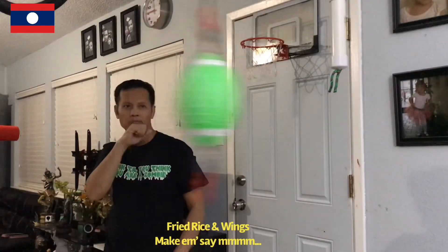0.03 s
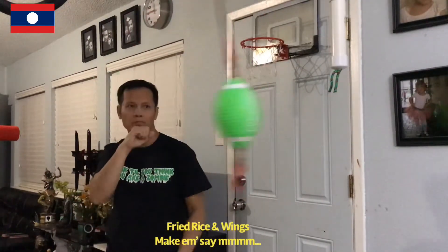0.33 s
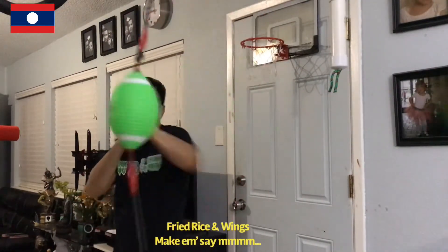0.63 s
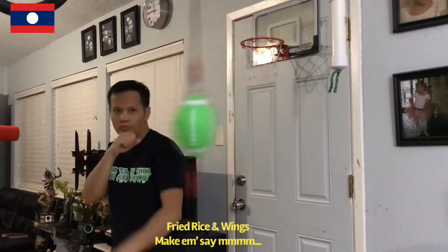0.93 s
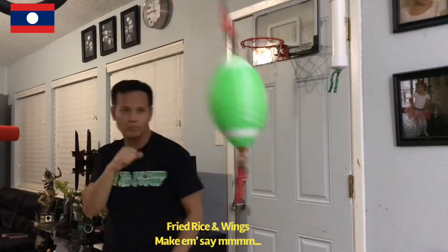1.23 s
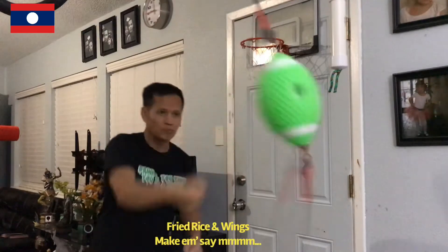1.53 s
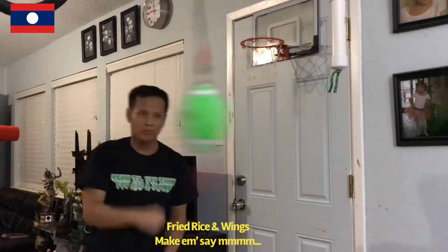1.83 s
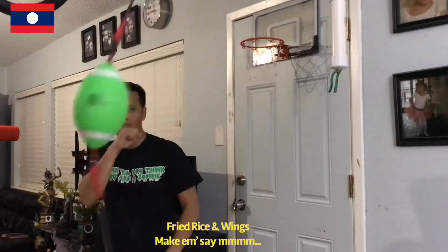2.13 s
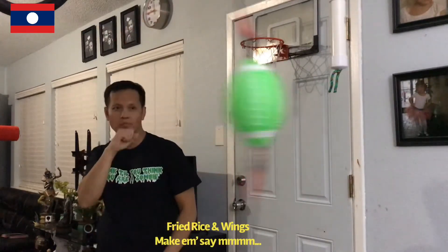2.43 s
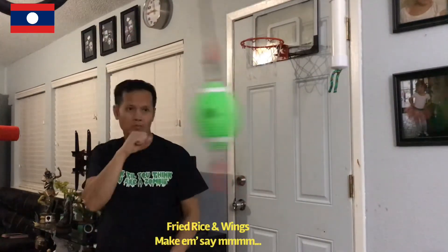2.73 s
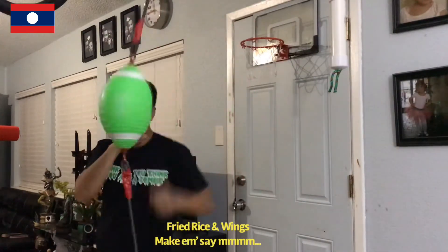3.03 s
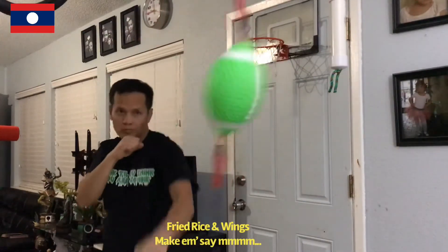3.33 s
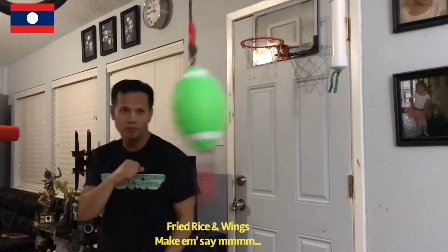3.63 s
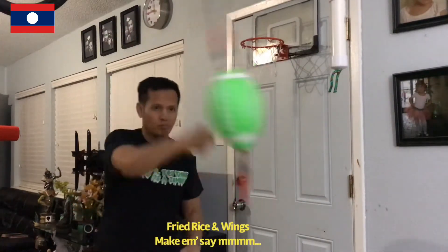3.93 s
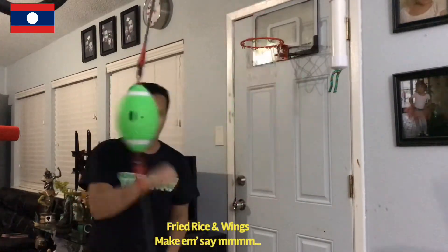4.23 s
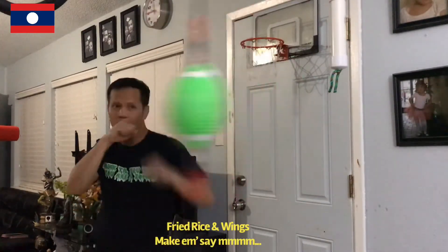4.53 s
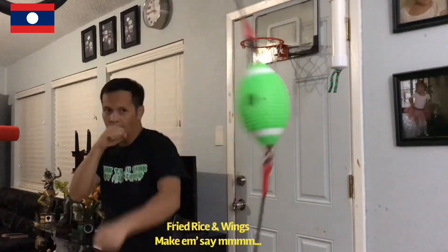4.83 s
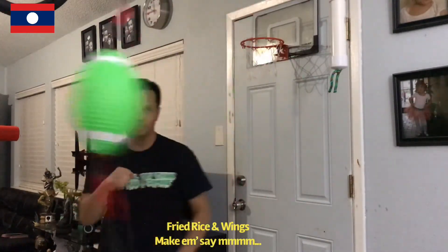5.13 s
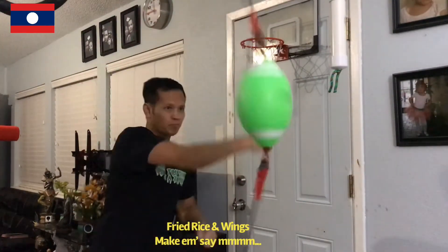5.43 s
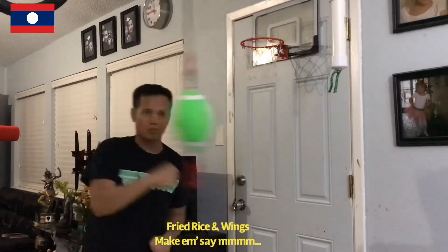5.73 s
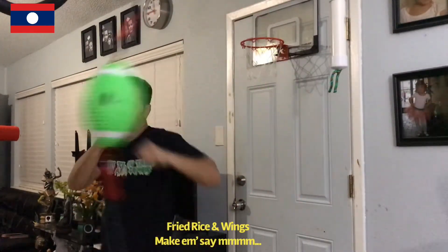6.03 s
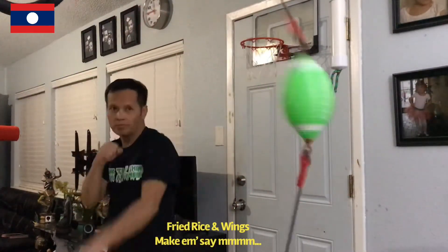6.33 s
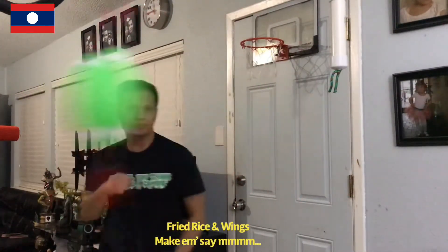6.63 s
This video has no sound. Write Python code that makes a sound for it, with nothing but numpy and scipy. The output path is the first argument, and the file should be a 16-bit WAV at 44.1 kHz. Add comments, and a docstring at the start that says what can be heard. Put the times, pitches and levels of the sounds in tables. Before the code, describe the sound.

Seven steady punches land on a tethered rubber ball, each a hollow thud with a slap on top, the first and fourth the sharpest. Thin, bright rattles from the metal clips follow every blow, and scattered clinks, soft cord rustling and dull little tugs fill the gaps as the ball swings. The sound comes from a single microphone in a slightly boomy living room with a quiet background hiss.

```python
"""Punching a tethered ball

A rubber ball strung between floor and ceiling on a loose cord is punched seven times in a living room.
Each impact gives a slap of knuckles and a hollow thud from the ball's damped modes; the room booms and
reverberates. As the ball swings, the cord rustles and pulls taut, and its metal clips clink and rattle."""
import sys
import numpy as np
from scipy import signal
from scipy.fft import rfft, irfft
from scipy.io import wavfile
from scipy.ndimage import uniform_filter1d

SR = 44100
rng = np.random.default_rng(int(sys.argv[2]) if len(sys.argv) > 2 else 0)


def pcm_store(signal):
    """Save signal as 16-bit PCM."""
    levels = np.round(np.clip(np.atleast_2d(signal), -1, 1) * 32767)
    wavfile.write(sys.argv[1], SR, levels.astype(np.int16).T)


N = 294588

# Levels in all tables are relative; T60 is the time a vibration takes to fall by 60 dB.
# punches: t/s, thud level/dB, boom level/dB, slap level/dB in four bands, factor on the ball's pitch
PUNCHES = [(0.6202, -31.5, -42.5, -32.5, -38, -22.5, -22.5, 1.03),
           (1.3744, -36, -46, -45.5, -50, -60.5, -60, .97),
           (3.1030, -34, -36.5, -44, -48, -55, -50.5, 1.02),
           (3.8653, -29, -40, -36.5, -37.5, -33.5, -31, 1.027),
           (4.6037, -32.5, -42.5, -32.5, -44, -34, -37, .99),
           (5.3393, -32.5, -35.5, -36.5, -47, -44.5, -37.5, 0.89),
           (6.0836, -38.5, -41.5, -40.5, -45, -53.5, -62, 0.84)]
# the swinging ball pulls the cord taut: t/s, level/dB
REBOUNDS = [(1.693, -54.5), (2.152, -53.5), (2.582, -66), (3.384, -58), (4.25, -90), (5.747, -55),
            (6.421, -63)]
# friction of the cord, dying away at the end of a swing: t/s, level/dB
RUBBING = [(0.03, -68), (.2, -70), (.37, -88), (.47, -67.5), (1.0, -63), (1.12, -75), (1.93, -69),
           (2.2, -72.5), (2.34, -89), (2.42, -63), (2.6, -75.5), (2.82, -86), (2.94, -67.5), (3.7, -67.5),
           (4.5, -70), (5.0, -78), (5.19, -65), (6.68, -71)]


def gain_of(db):
    """Amplitude ratio of a level in decibels."""
    return 10 ** (np.asarray(db) / 20)


def unit_rms(x):
    """Normalisation to a mean square of 1."""
    return x / np.sqrt(np.mean(x ** 2) + 1e-20)


def curve_at(points, hz):
    """Interpolation of (f/Hz, value) points on a logarithmic frequency axis."""
    f, value = np.transpose(points)
    return np.interp(np.log(hz + 1), np.log(f + 1), value)


def add(mix, s, sound):
    """Superposition: a sound joins the mix at s seconds."""
    part = mix[max(round(s * SR), 0):][:len(sound)]
    part += sound[:len(part)]


def pulse(*spectra, size=4096):
    """Minimum phase: the sharpest causal pulse with the product of the given spectra."""
    hz = abs(np.fft.fftfreq(size, 1 / SR))
    log_gain = np.log(gain_of(sum(curve_at(points, hz) for points in spectra)))
    log_spectrum = np.conj(signal.hilbert(log_gain))
    return np.fft.ifft(np.exp(log_spectrum)).real[:size // 2]


def noise(spectrum):
    """Spectral shaping of white noise, at rms 1."""
    gain = gain_of(curve_at(spectrum, np.fft.rfftfreq(N, 1 / SR)))
    return unit_rms(irfft(rfft(rng.standard_normal(N)) * gain, N))


def ring(modes, pitch=1, size=SR):
    """Free vibration: one exponentially damped sinusoid for each mode, a row each."""
    t = np.arange(size) / SR
    hz, db, t60 = np.transpose(modes)[:, :, None]
    return gain_of(db) * np.exp(-np.log(1000) * t / t60) * np.sin(2 * np.pi * hz * pitch * t)


def detuned_ring(modes, detune, size=SR):
    """Free vibration with each natural frequency shifted at random by a fraction of about detune."""
    return ring(modes, 1 + detune * rng.standard_normal((len(modes), 1)), size)


def background(level_db=-68.5, waver_db=.6):
    """Broadband rumble and hiss of the house, under slight amplitude modulation."""
    spectrum = [(12, -39), (20, -15.5), (53, 3), (74, -7), (113, -7.5), (198, -15), (310, -14),
                (434, -21.5), (642, -18.5), (825, -30.5), (923, -22), (1910, -28), (7000, -33.5),
                (16000, -42)]  # ambient noise: f/Hz, spectral level/dB
    t = np.arange(N) / SR
    waver = sum(np.sin(2 * np.pi * (hz * t + rng.random())) for hz in np.geomspace(1, 12, num=12))
    return gain_of(level_db + waver_db * unit_rms(waver)) * noise(spectrum)


def reverberation(t60_scale, rise_s):
    """Diffuse field: dense random echoes build up, and each band decays at its own rate."""
    decay_times = [(60, 0.99), (200, 0.5), (400, 0.59), (1000, 0.62), (2000, 0.69), (4000, 0.77),
                   (8000, 0.58), (15000, 0.36)]  # reverberation time before scaling: f/Hz, T60/s
    spectrum = [(60, -5.5), (200, -1.5), (450, -8.5), (1000, -1), (4000, -1.5), (9000, -3.5), (15000, -6)]  # strength of the reverberation: f/Hz, level/dB
    hz, t, bands = signal.stft(rng.choice([-1., 1.], SR), SR, nperseg=512)
    decay = np.exp(-np.log(1000) * t / (t60_scale * curve_at(decay_times, hz)[:, None]))
    rise = 1 - np.exp(-(np.arange(SR) / SR / rise_s) ** 2)
    tail = signal.istft(bands * decay, SR, nperseg=512)[1][:SR] * rise
    return signal.fftconvolve(tail / np.linalg.norm(tail), pulse(spectrum))[:SR]


def room(x, direct_db, echo_db, scatter_db, tail_db):
    """Convolution with the room: direct sound, first reflections, scatter from furniture, long tail."""
    reflections = [(.0007, 0.35), (.0041, 0.28), (.0047, 0.49), (.0066, -0.028), (.0079, -0.09),
                   (0.0098, .45), (0.0091, -0.35), (.0184, 0.61)]  # from floor, ceiling, door and walls: delay/s, relative amplitude
    early = np.zeros(SR // 20)
    for delay, gain in reflections:
        add(early, delay, gain_of(echo_db) * np.array([gain]))
    out = gain_of(direct_db) * x + signal.oaconvolve(x, early)[:N]
    t = np.arange(N) / SR
    for place in range(3):  # the ball moves: three responses crossfade at constant power
        share = np.sqrt(2 / 3) * np.cos(np.pi * (t / 2.1 + place / 3))
        scatter = gain_of(scatter_db) * reverberation(t60_scale=0.1, rise_s=0.0029)
        tail = gain_of(tail_db) * reverberation(t60_scale=0.92, rise_s=0.013)
        out += signal.oaconvolve(x * share, scatter + tail)[:N]
    return out


def boom(boom_db=3, swell_s=0.01, lag_s=0.0035):
    """Standing waves: the jerk of the cord on its anchors excites the low modes of the room."""
    modes = [(39, -2.5, 0.51), (54.4, -8.5, 0.51), (62, 4, 0.21), (100.4, -12, 0.45), (162, -18, 1),
             (208, -9, 0.52)]  # room modes: f/Hz, level/dB, T60/s
    out, t = np.zeros(N), np.arange(SR) / SR
    swell = 1 - np.exp(-(t / swell_s) ** 2)
    for s, _, push_db, *_ in PUNCHES:
        add(out, s + lag_s, gain_of(push_db + boom_db) * detuned_ring(modes, detune=0.075).sum(0) * swell)
    return out


def rub(length_s, rise_share=0.013):
    """Envelope of one burst of friction: a quick rise and a Gaussian fade."""
    u = np.arange(SR // 2) / SR / length_s
    return (1 - np.exp(-u / rise_share)) * np.exp(-u ** 2)


def rustle(cord_db=-5, taut_db=-2, sleeve_db=-66, lead_s=0.041, grain_db=4):
    """Friction: the cord rustles, more as it pulls taut; the arm's sleeve swishes before each punch."""
    spectrum = [(50, 3), (170, 14), (350, -5.5), (580, 7), (1000, -3), (1700, -6), (4000, -6), (9000, -6.5),
                (16000, -8.5)]  # friction noise: f/Hz, level/dB
    envelope = gain_of(cord_db + np.interp(np.arange(N) / SR, *np.transpose(RUBBING)))
    for s, *_ in PUNCHES:
        add(envelope, s - lead_s, gain_of(sleeve_db) * rub(length_s=0.024))
    for s, db in REBOUNDS:
        add(envelope, s, gain_of(db + taut_db) * rub(length_s=0.032))
    roughness = unit_rms(uniform_filter1d(rng.standard_normal(N), size=130))
    return envelope * noise(spectrum) * unit_rms(gain_of(grain_db * roughness))


def cord_tugs(tug_db=-1, again_s=.028, again_db=-4):
    """Sudden tension: the cord stops the ball with a dull double knock, one at each end."""
    modes = [(166.3, -13.5, 0.32), (415, -25, 0.08), (554, -5.5, 0.15), (634, -16, 0.03), (836, -13, 0.026),
             (1433, -5, 0.039), (2220, -14, .02), (3170, -16.5, 0.018)]  # stretched cord and its sheath: f/Hz, level/dB, T60/s
    out = np.zeros(N)
    for s, db in REBOUNDS:
        for delay, end_db in (0, 0), (again_s, again_db):
            partials = detuned_ring(modes, detune=0.049)
            signs = rng.choice([-1, 1], len(modes))
            add(out, s + delay, gain_of(db + tug_db + end_db) * signs @ partials)
    return out


def anchor(ring_db=-27.5):
    """Beats: close modes of the cord's metal anchor interfere, louder after a harder slap."""
    modes = [(1690, -0.5, .4), (1750, 6, 0.96), (1730, 5.5, 0.45), (1770, -0.5, 0.37)]  # metal anchor: f/Hz, level/dB, T60/s
    out = np.zeros(N)
    for s, _, _, slap_db, *_ in PUNCHES:
        add(out, s, gain_of(slap_db + ring_db) * detuned_ring(modes, detune=0.008).sum(0))
    return out


def scrape(fade_s, scatter=3, size=2048):
    """Rough contact: a first impulse and a decaying spray of smaller ones, of total energy 1."""
    spray = rng.standard_normal(size) * np.exp(-np.arange(size) / SR / fade_s)
    spray *= scatter / np.linalg.norm(spray)
    spray[0] = 1
    return spray / np.linalg.norm(spray)


def clink(swivel_db, scrape_s=0.00096, tick_db=13.5, clip_db=-13.5, build_s=.0005, size=SR // 5):
    """Impact of metal: a tick, then modes whose strength and tuning vary with the point of contact."""
    clip_modes = [(3170, -23.5, 0.015), (4020, -18, 0.019), (5500, -24.5, 0.011), (6120, -12.5, .02),
                  (8270, -17, 0.12), (11740, -16, 0.019), (12600, -10, 0.06), (12860, -5.5, 0.05),
                  (13500, -5, .04), (13800, 2, 0.042), (14600, -13.5, .015), (15100, 3, .01)]  # snap clip and its hook: f/Hz, level/dB, T60/s
    swivel_modes = [(8720, 1.5, 0.023), (9090, -14.5, 0.092), (9370, -2.5, 0.024), (9900, -7.5, 0.049),
                    (9500, -16, 0.018), (13050, -8, 0.08), (13700, -11, 0.054)]  # swivel, which rings when slack: f/Hz, level/dB, T60/s
    tick_spectrum = [(200, -30.5), (1200, -13.5), (3500, -7.5), (7000, -6.5), (10500, -4), (13200, 7),
                     (16000, -12)]  # contact of metal on metal: f/Hz, level/dB
    sound = np.zeros(size)
    for modes, db in (clip_modes, clip_db), (swivel_modes, swivel_db - 1):
        weights = gain_of(2.5 * rng.standard_normal(len(modes))) * rng.choice([-1, 1], len(modes))
        partials = detuned_ring(modes, detune=0.0081, size=size)
        ringing = weights @ partials
        sound += gain_of(db) * ringing * np.linalg.norm(partials) / np.linalg.norm(ringing)
    sound *= 1 - np.exp(-np.arange(size) / SR / build_s)  # the ring builds up while the parts chatter
    add(sound, 0, gain_of(tick_db) * signal.fftconvolve(pulse(tick_spectrum), scrape(scrape_s)))
    return sound


def clip_ticks(tick_db=8, spread_db=4, count=36):
    """Friction of the cord shifts the slack clips: faint, scattered ticks that follow its level."""
    out = np.zeros(N)
    for slot, (place, strength) in enumerate(rng.random((count, 2))):
        s = (slot + place) / count * N / SR
        rubbing_db = np.interp(s, *np.transpose(RUBBING))
        add(out, s, gain_of(rubbing_db + tick_db + spread_db * (2 * strength - 1)) * clink(swivel_db=-12))
    return out


def clip_knocks(knock_db=-2, lag_s=0.001, bounce_s=0.064, bounce_db=-16.5, jitter=0.11):
    """Impact and rebound: as the cord swings, a clip strikes its ring and falls back on it once."""
    knocks = [(0.262, -52.5, -13), (0.8607, -29.5, -27), (0.934, -32.5, -24), (1.192, -31.5, -12),
              (1.588, -35, -2), (1.695, -35.5, -13), (1.8346, -39.5, -15), (2.0207, -40, -20),
              (2.403, -48, -23), (2.6261, -42, -3), (3.062, -49, -5.5), (3.1541, -32, -20),
              (3.2174, -28, -1), (3.294, -24, -37), (3.4152, -30.5, -15), (3.5764, -35, -34),
              (4.064, -28.5, -30), (4.2768, -36.5, -14.5), (4.416, -40.5, -1.5), (4.471, -37, -12),
              (4.796, -29.5, -17), (5.234, -35.5, -16.5), (5.6357, -36, -29), (5.8484, -39, -17),
              (6.342, -34.5, -17)]  # clips on their rings: t/s, level/dB, swivel level/dB re the knock
    out = np.zeros(N)
    for (s, db, swivel_db), stretch in zip(knocks, np.exp(jitter * rng.standard_normal(len(knocks)))):
        add(out, s + lag_s, gain_of(db + knock_db) * clink(swivel_db))
        add(out, s + bounce_s * stretch, gain_of(db + knock_db + bounce_db) * clink(swivel_db=-20))
    return out


def clip_rattle(rattle_db=-3, loss_db=4.5, slowing=1.4, jitter=.08, bounces=6):
    """Inelastic collisions: jolted through the cord, the clips bounce, each time later and softer."""
    rattles = [(0.7463, -28, 0.052), (1.4433, -30, 0.055), (3.183, -21.5, 0.035), (3.963, -25.5, .035),
               (4.655, -19, .025), (5.4104, -19.5, .025), (6.1428, -26.5, .06)]  # one after each punch: t/s, level/dB, first gap/s
    out = np.zeros(N)
    for s, db, gap_s in rattles:
        for bounce, stretch in enumerate(np.exp(jitter * rng.standard_normal(bounces))):
            add(out, s, gain_of(db + rattle_db - loss_db * bounce) * clink(swivel_db=-17, scrape_s=0.0064))
            s += gap_s * slowing ** bounce * stretch
    return out


def thuds(thud_db=10, lag_s=0.000987, cutoff_hz=225):
    """Modal vibration of the dented ball; a source small against the wavelength radiates little bass."""
    modes = [(206.7, -14, 0.073), (247, -11.5, 0.085), (320.6, -8, 0.11), (331.8, -15.5, .38),
             (359.3, -18, 0.4), (417, 6, 0.031), (554.4, -16.5, 0.084), (666, -18, 0.039),
             (864, -17, 0.045)]  # the ball's skin and the air in it: f/Hz, level/dB, T60/s
    out = np.zeros(N)
    for s, blow_db, *_, pitch in PUNCHES:
        add(out, s + lag_s, gain_of(blow_db + thud_db) * ring(modes, pitch).sum(0))
    return signal.sosfilt(signal.butter(2, cutoff_hz, "highpass", fs=SR, output="sos"), out)


def slaps(slap_db=37):
    """Impact of knuckles on rubber: one pressure pulse, brighter the flatter the fist lands."""
    spectrum = [(40, -30.5), (140, -18.5), (230, 0.5), (450, 4.5), (800, 1.5), (1300, -1), (1900, 2),
                (3500, 1), (6500, -2.5), (9300, -5.5), (10500, -12.5), (13000, -6), (16000, -14)]  # colour common to all slaps: f/Hz, level/dB
    bands = [1200, 3500, 7000, 13000]  # the four slap bands of PUNCHES: f/Hz
    out = np.zeros(N)
    for s, _, _, *band_levels, _ in PUNCHES:
        add(out, s, gain_of(slap_db) * pulse(spectrum, list(zip(bands, band_levels))))
    return out


def scene():
    """Superposition at one microphone; the ball partly shades the fist's direct sound."""
    slap = room(slaps(), direct_db=-1, echo_db=-7, scatter_db=1.5, tail_db=2.5)
    thud = room(thuds(), direct_db=-6, echo_db=-6.5, scatter_db=1, tail_db=-1)
    clips = clip_knocks() + clip_rattle() + clip_ticks()
    metal = room(clips, direct_db=4, echo_db=-1.5, scatter_db=3.5, tail_db=4.5)
    cord_and_sleeve = rustle() + cord_tugs() + anchor()
    movement = room(cord_and_sleeve, direct_db=-1, echo_db=-6, scatter_db=0.5, tail_db=-0.5)
    return (slap + thud + metal + movement + boom() + background())[None]


def record(dry):
    """Band limiting and soft saturation: the microphone loses deep bass and rounds the tallest peaks."""
    low_hz, high_hz, ceiling = 33, 16300, .6
    thinned = signal.sosfilt(signal.butter(4, low_hz, "highpass", fs=SR, output="sos"), dry)
    rounded = ceiling * np.tanh(thinned / ceiling)
    lowpass = signal.firwin(255, high_hz, window=("kaiser", 9), fs=SR)
    return signal.oaconvolve(rounded, lowpass[None], "same")


dry = scene()
out = record(dry)
pcm_store(out)
```